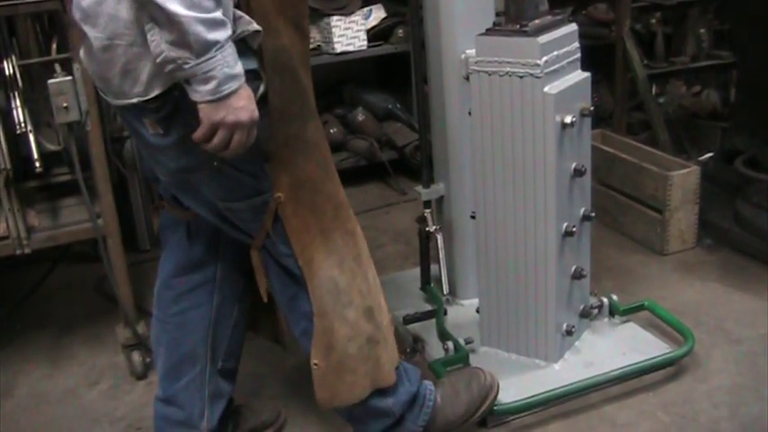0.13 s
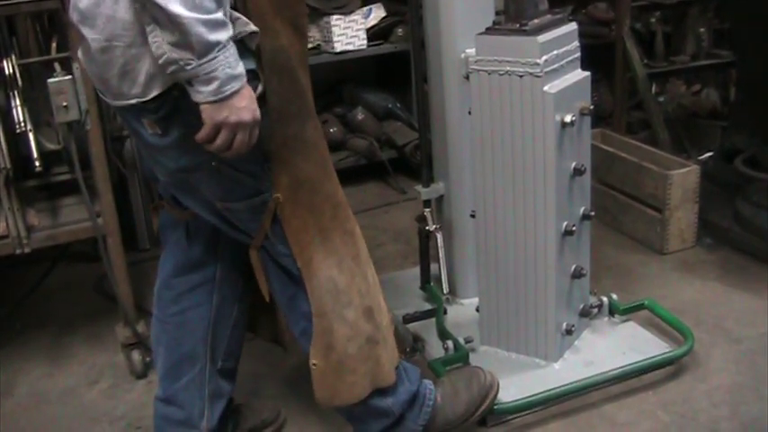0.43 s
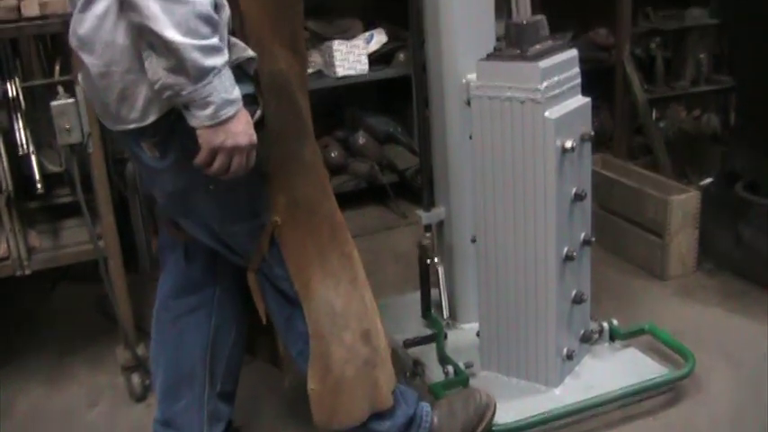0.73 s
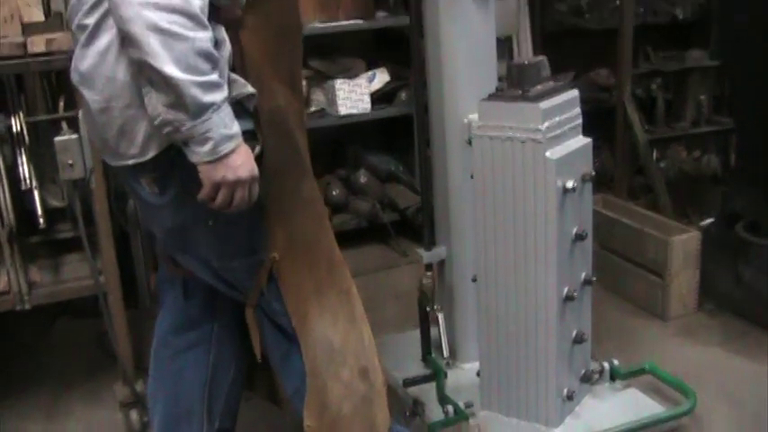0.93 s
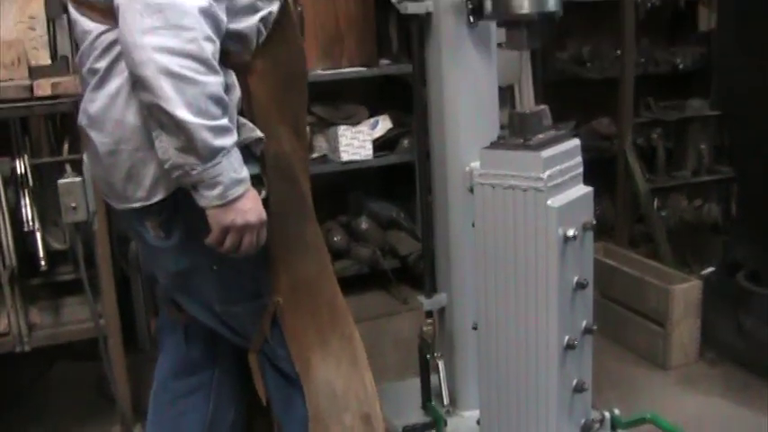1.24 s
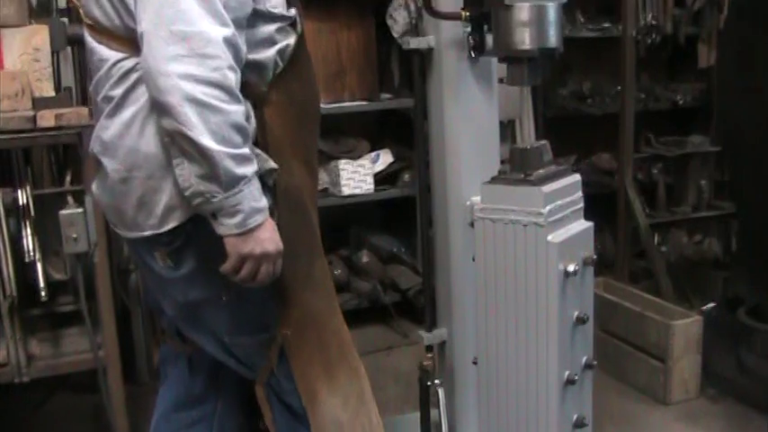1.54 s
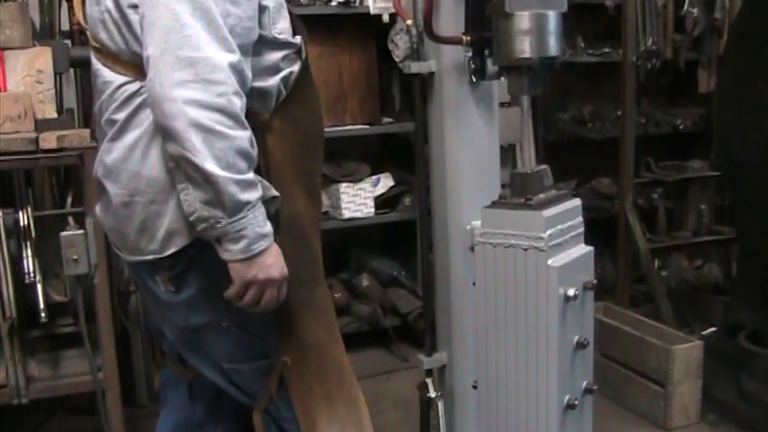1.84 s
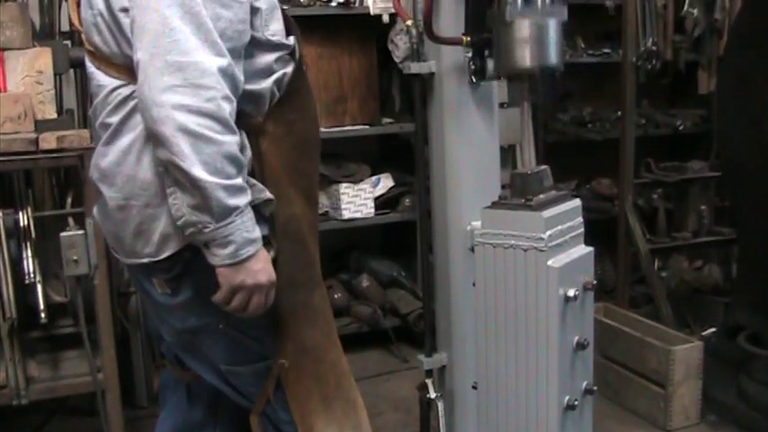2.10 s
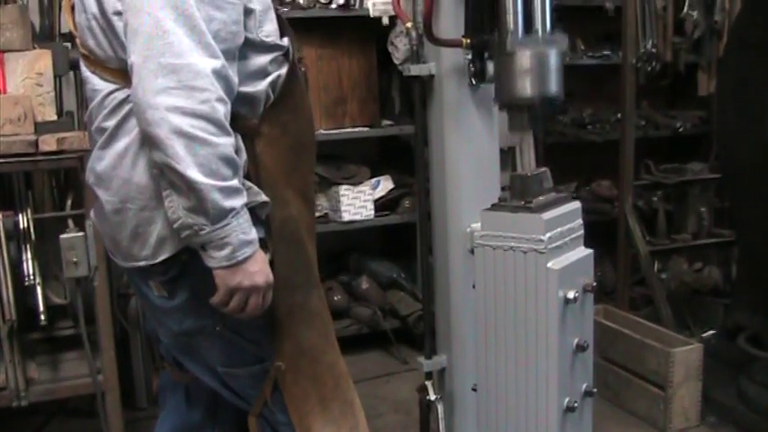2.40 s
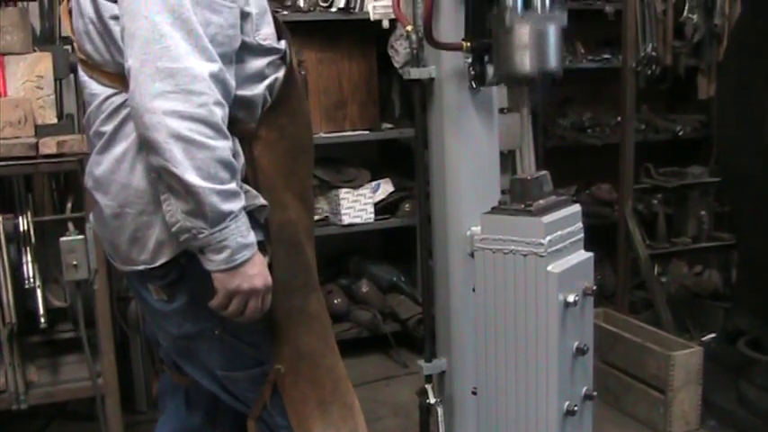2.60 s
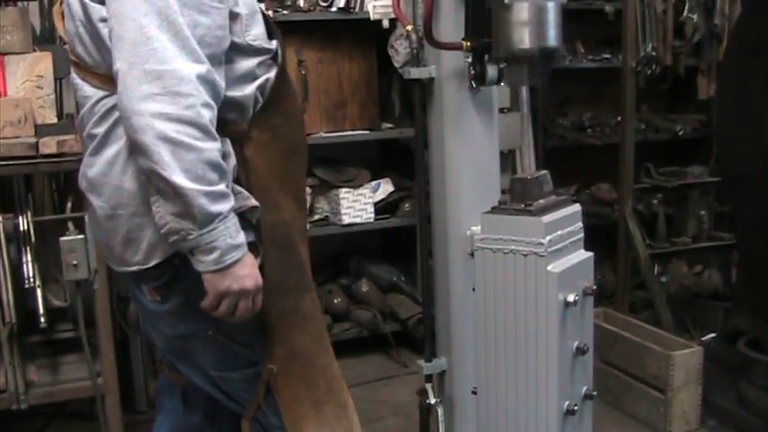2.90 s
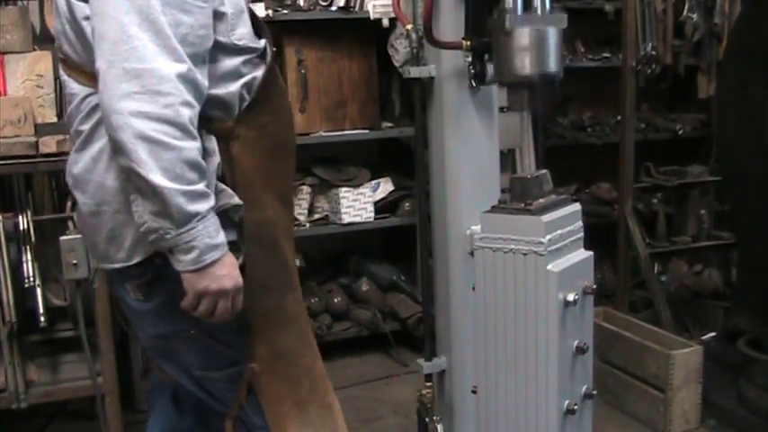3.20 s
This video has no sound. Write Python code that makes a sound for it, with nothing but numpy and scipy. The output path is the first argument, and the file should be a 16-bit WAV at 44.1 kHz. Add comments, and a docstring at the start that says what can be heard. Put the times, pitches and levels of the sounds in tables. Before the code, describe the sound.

An air power hammer hisses loudly over soft thuds, close by in a ringing workshop. At 0.7 seconds the air stops, followed by a knock, a sharp click and steel clanks. A short puff comes at 1.1 seconds, then a faint sinking hum. From 1.6 seconds the hiss returns, with heavier thuds about three times a second. At 3 seconds it cuts off with knocks, a click and clanks.

```python
"""An air power hammer idles on its foot treadle: exhaust air hisses from the valve and the ram thuds at
both ends of its stroke. The treadle is let go: the air stops at 0.7 s, the stop knocks, the valve clicks,
the steel linkage clanks. A short puff vents and a faint hum sinks. From 1.6 s the hammer runs again with
heavier thuds; at 3 s it shuts off with more knocks, a click and clanks. Throughout, the hard workshop
rings on for half a second and an automatic gain control turns loud passages down."""
import sys
import numpy as np
from scipy import signal
from scipy.fft import rfft, irfft, next_fast_len
from scipy.io import wavfile
from scipy.ndimage import uniform_filter1d

SR = 44100
rng = np.random.default_rng(int(sys.argv[2]) if len(sys.argv) > 2 else 0)


def int16_out(signal):
    """Quantize to a 16-bit WAV file."""
    q = np.round(np.clip(np.atleast_2d(signal).T, -1, 1) * 32767)
    wavfile.write(sys.argv[1], SR, q.astype(np.int16))


N = 147735
LEAD_IN = 30000  # samples
TOTAL = N + LEAD_IN
TIME_S = (np.arange(TOTAL) - LEAD_IN) / SR


# jet flow, one list per valve opening: time_s, level_db, roar_offset_db
JET_OPENINGS = [
    [(0.0, -19.5, 0.5), (0.674, -19.5, 1.5), (0.68, -18.5, 0)],
    [(1.6, -21.5, 1.5), (1.614, -16, 2.5), (1.662, -17.5, 1), (2.538, -20, 0), (2.984, -19, 0.5),
     (3.0, -19.5, 4)],
]
# short vent: time_s, level_db
PUFF_ENVELOPE = [(1.086, -47), (1.093, -29), (1.101, -26.5), (1.115, -23.5), (1.135, -23.5), (1.15, -29)]
# jet hiss: freq_hz, density_db
HISS_SPECTRUM = [(1300, -22), (2200, -11.5), (2900, -5.5), (3800, -2.5), (4970, -6), (5550, -2.5),
                 (5950, 1), (6500, 0), (7200, 0.5), (7600, -3.5), (8800, -8), (10000, -7), (11000, -9),
                 (12000, -10), (13500, -13.5), (15650, -15.5), (15800, -60)]
# jet roar: freq_hz, density_db
ROAR_SPECTRUM = [(150, -37), (250, -20.5), (410, -15), (560, -11.5), (700, -12), (880, -7), (1010, -4.5),
                 (1400, -2), (1750, 0), (1900, 0), (2100, 1), (2300, -6.5), (2600, -5.5), (3400, -9.5),
                 (5700, -60)]
# vent noise: freq_hz, density_db
PUFF_SPECTRUM = [(240, -53), (400, -24), (560, -11), (800, -15), (1280, -3.5), (1480, 0), (1980, -5),
                 (2370, -2.5), (3500, -1.5), (4400, 1), (4900, 0), (5400, -3.5), (7300, -0.5), (8700, -1),
                 (9500, -5.5), (15600, -14.5), (15800, -58)]

def exhaust(open_s=0.027, shut_db_per_s=500):
    """The air jet swells as the valve opens, follows the flow and is cut off when it shuts."""
    def flow(time_s, level_db):
        shut_db = shut_db_per_s * np.maximum(TIME_S - time_s[-1], 0)
        return amp(np.interp(TIME_S, time_s, level_db) - shut_db)

    hiss, roar = np.zeros((2, TOTAL))
    for opening, rows in enumerate(JET_OPENINGS):
        time_s, level_db, roar_offset_db = np.transpose(rows)
        rise = np.clip(1 + (TIME_S - time_s[0]) / open_s, 0, 1) ** 3 if opening else 1
        level = rise * flow(time_s, level_db)
        hiss += level
        roar += level * amp(np.interp(TIME_S, time_s, roar_offset_db))
    time_s, level_db = np.transpose(PUFF_ENVELOPE)
    puff = (TIME_S > time_s[0]) * flow(time_s, level_db)
    jet = hiss * stereo_noise(HISS_SPECTRUM, flicker_db=1)
    jet += amp(-6.5) * roar * stereo_noise(ROAR_SPECTRUM, flicker_db=2.5)
    jet += puff * stereo_noise(PUFF_SPECTRUM, flicker_db=0)
    return amp(-3.5) * jet + amp(-7) * reverb(jet)


# ram blows: start_s, level_db, rattle_db, focus_hz
RAM_THUDS = [(0.223, -25.5, -11, 530), (0.329, -32.5, -8, 471), (0.572, -27.5, -8, 544),
             (0.659, -29.5, -8, 584), (0.687, -25.5, -5, 216), (1.127, -33, -8, 600), (1.6, -30, 1, 483),
             (1.846, -25.5, -3, 600), (1.919, -29, -3, 390), (2.14, -15, 2.5, 402),
             (2.252, -23.5, -13, 230), (2.492, -13.5, 1, 233), (2.615, -24, -12, 323),
             (2.849, -11, 4.5, 247), (2.974, -21, -6, 245), (3.26, -24, -16, 550), (3.285, -19.5, -7, 224)]
# hammer frame: pitch_hz, level_db, t60_s
FRAME_MODES = [(95, -10, 0.055), (140, -3.5, 0.066), (184.8, -18.5, 0.29), (228.6, 3.5, 0.053),
               (321, -3, 0.049), (392, -1.5, 0.075), (470.4, -3.5, 0.088), (601, 4, 0.047),
               (786, 0.5, 0.13)]

def ram(out):
    """The ram ends its stroke: the frame rings low and rattles."""
    rattle = [(100, -25), (600, -6), (1500, 0), (3300, 0), (4500, -18), (16000, -60)]  # freq_hz, density_db
    for start_s, level_db, rattle_db, focus_hz in RAM_THUDS:
        body = ring(FRAME_MODES, focus_hz, wander=0.15, db_per_octave=5)
        body += burst(rattle, rattle_db, t60_s=0.081)
        add_blow(out, body, start_s, level_db, attack_s=0.008, wet_db=-6)


# valve action: start_s, level_db, low_knock_db
VALVE_CLICKS = [(0.9111, -15.5, 9.5), (1.4445, -51, -2), (1.5144, -61, -2), (3.2005, -15, 6)]
# valve body: pitch_hz, level_db, t60_s
VALVE_MODES = [(4300, -14, .12), (4900, 4, .012), (5720, -8, .02), (6800, 3, .015), (6850, -20, .1),
               (7930, -3, .02), (8500, -16, .04), (10700, -5, .01), (13900, 4, .008), (15000, 3, .006)]

def valve(out):
    """The valve clicks: a short crack over a bright ring."""
    for start_s, level_db, low_db in VALVE_CLICKS:
        crack = [(300, low_db - 20), (1300, low_db), (3000, -8), (5000, -3.5), (14000, 0), (16500, -1.5)]
        body = ring(VALVE_MODES, focus_hz=8000, wander=0.5) + burst(crack, level_db=2, t60_s=0.0085)
        add_blow(out, body, start_s, level_db, attack_s=0.001, wet_db=-2)


# treadle blows: start_s, level_db, focus_hz
TREADLE_KNOCKS = [(.8186, -20.5, 1900), (.84, -31, 800), (3.0611, -17.5, 2300), (3.068, -19, 2300),
                  (3.085, -25.5, 1200)]
# treadle stop: pitch_hz, level_db, t60_s
STOP_MODES = [(737, 2.5, 0.12), (1030, 0.5, 0.02), (1624, 1, 0.034), (2240, 2.5, 0.029), (2450, -13, 0.029),
              (3590, 7, 0.027), (6420, 4, .015)]

def treadle(out):
    """The released treadle hits its stop with a dull knock."""
    dull = [(300, -10), (800, -1), (2500, 0.5), (6000, -11.5), (16000, -35)]
    for start_s, level_db, focus_hz in TREADLE_KNOCKS:
        body = ring(STOP_MODES, focus_hz, wander=0.22) + burst(dull, level_db=-2, t60_s=0.096)
        add_blow(out, body, start_s, level_db, attack_s=0.001, wet_db=-3.5)


# linkage blows: start_s, level_db, focus_hz
LINKAGE_CLANKS = [(0.9631, -17.5, 1800), (.968, -19.5, 1460), (.98, -33, 900), (1.003, -32.5, 1450),
                  (1.02, -32, 1600), (3.205, -22, 1800), (3.2344, -16, 1820), (3.2672, -13.5, 2800),
                  (3.28, -20, 3400), (3.291, -19.5, 3100), (3.303, -22.5, 2800), (3.328, -24, 2800)]
# steel links: pitch_hz, level_db, t60_s
LINKAGE_MODES = [(860, -2, 0.064), (1187, -8, 0.078), (1434, -3.5, 0.042), (1610, -8, 0.056),
                 (1823, 2, 0.03), (1855, -15, 0.019), (2420, -11.5, 0.067), (2860, -6, 0.042),
                 (3130, -10, 0.023), (3590, -10, 0.024), (4030, -6.5, 0.064), (4880, -1, 0.039),
                 (7040, 4, 0.033), (8550, 0, .03)]

def linkage(out):
    """The steel linkage clanks in quick clusters of ringing blows."""
    sharp = [(300, -4), (1000, 0), (3000, -2.5), (9000, -14), (16000, -55)]
    for start_s, level_db, focus_hz in LINKAGE_CLANKS:
        body = ring(LINKAGE_MODES, focus_hz, wander=0.22) + burst(sharp, level_db=-9, t60_s=0.059)
        add_blow(out, body, start_s, level_db, attack_s=0.002, wet_db=0)


# sinking hum: time_s, pitch_hz, level_db
HUM_GLIDE = [(1.15, 205, -65), (1.22, 189.6, -52), (1.36, 176, -54), (1.42, 170.6, -60), (1.5, 154, -53),
             (1.56, 150, -59), (1.6, 152, -75)]
# microphone hiss: freq_hz, density_db
MIC_SPECTRUM = [(120, -29), (200, 3), (263, -7), (517, -2), (588, -7), (2000, -6), (5870, -15),
                (15700, -31)]
# workshop rumble: freq_hz, density_db
RUMBLE_SPECTRUM = [(15, -38), (25, -12), (159, -4.5), (213, -8.5), (489, -18.5), (567, -18), (814, -15.5),
                   (1030, -24), (1820, -33), (2620, -39), (4000, -42), (5200, -59), (8800, -120)]

def background():
    """An unsteady low hum, the hiss of each microphone and workshop rumble."""
    time_s, pitch_hz, level_db = np.transpose(HUM_GLIDE)
    phase = 2 * np.pi * np.cumsum(np.interp(TIME_S, time_s, pitch_hz)) / SR
    drift = 0.0286 * np.cumsum(rng.standard_normal(TOTAL))
    hum = amp(np.interp(TIME_S, time_s, level_db)) * np.sin(phase + drift)
    hiss = amp(-59) * coloured_noise(MIC_SPECTRUM, (2, TOTAL))
    rumble = amp(-52.5) * stereo_noise(RUMBLE_SPECTRUM, flicker_db=2.5)
    return rumble + hum + hiss


# workshop decay: freq_hz, t60_s
ROOM_DECAY = [(200, 0.29), (1000, 0.48), (3000, 0.53), (7000, 0.37), (12000, 0.29), (16000, 0.33)]

def reverb(x):
    """The hard room answers after 8 ms; each frequency dies at its own rate."""
    hz, t, bins = signal.stft(rng.standard_normal((2, LEAD_IN)), SR, nperseg=256)
    decay = amp(-60 * t / curve(ROOM_DECAY, hz)[:, None])
    tail = spread(signal.istft(bins * decay, SR, nperseg=256)[1], np.ones_like)
    tail = np.pad(tail, ((0, 0), (350, 0))) / np.linalg.norm(tail[0])
    return signal.fftconvolve(x, tail, axes=1)[:, :x.shape[1]]


# stereo width: freq_hz, side_over_mid_db
STEREO_WIDTH = [(60, -20), (92, -21), (140, -19), (210, -38), (330, -20), (500, -22.5), (770, -16.5),
                (1170, -21), (1790, -19), (2740, -9.5), (4190, -8), (6410, -11.5), (9810, -4),
                (15000, -2.5)]

def spread(pair, colour):
    """Two unrelated signals become left and right, wider in the treble."""
    def response(hz):
        angle = np.arctan(amp(curve(STEREO_WIDTH, hz)))
        return colour(hz) * [np.cos(angle), np.sin(angle)]

    mid, side = filtered(pair, response)
    return np.array([mid + side, mid - side])


BLOW_TIME_S = np.arange(SR // 4) / SR

def ring(modes, focus_hz, wander, db_per_octave=13):
    """Struck modes decay, weaker away from focus_hz and roughened by phase wander."""
    hz, level_db, t60_s = np.transpose(modes)[..., None]
    steps = rng.standard_normal((len(modes), len(BLOW_TIME_S)))
    drift = wander * np.sqrt(hz / SR) * np.cumsum(steps, axis=1)
    focus_loss_db = db_per_octave * np.abs(np.log2(hz / focus_hz))
    scatter_db = rng.normal(0, 1.5, hz.shape)
    gains = amp(level_db - focus_loss_db + scatter_db - 60 * BLOW_TIME_S / t60_s)
    return np.sum(gains * np.sin(2 * np.pi * hz * BLOW_TIME_S + drift), axis=0)


def burst(spectrum, level_db, t60_s):
    """The dying noise of an impact."""
    return amp(level_db - 60 * BLOW_TIME_S / t60_s) * coloured_noise(spectrum, len(BLOW_TIME_S))


def add_blow(out, body, start_s, level_db, attack_s, wet_db):
    """Mix in one centred blow with its own room tail; level_db sets its dry peak."""
    hit = body * (1 - np.exp(-BLOW_TIME_S / attack_s))
    hit = amp(level_db) * hit / np.abs(hit).max()
    hit = np.tile(np.pad(hit, (0, SR // 2)), (2, 1))
    start = round(start_s * SR) + LEAD_IN
    span = out[:, start:start + hit.shape[1]]
    span += (hit + amp(wet_db) * reverb(hit))[:, :span.shape[1]]


def stereo_noise(spectrum, flicker_db):
    """Unit-rms noise that flickers in patches of time and frequency."""
    bins = signal.stft(rng.standard_normal((2, TOTAL)), nperseg=512)[2]
    patches = uniform_filter1d(rng.standard_normal(bins.shape[1:]), 6, axis=0)
    patches = unit_rms(uniform_filter1d(patches, 14, axis=1))
    pair = signal.istft(bins * amp(flicker_db * patches), nperseg=512)[1][:, :TOTAL]
    return unit_rms(spread(pair, lambda hz: amp(curve(spectrum, hz))))


def coloured_noise(spectrum, shape):
    return unit_rms(filtered(rng.standard_normal(shape), lambda hz: amp(curve(spectrum, hz))))


def filtered(x, response):
    size = next_fast_len(x.shape[-1] + 8192)
    gain = response(np.fft.rfftfreq(size, 1 / SR))
    return irfft(rfft(x, size) * gain, size)[..., :x.shape[-1]]


def curve(points, hz):
    """Interpolate (freq_hz, value) points on a log frequency axis."""
    freq_hz, values = np.transpose(points)
    return np.interp(np.log(hz + 1), np.log(freq_hz + 1), values)


def unit_rms(x):
    return x / np.sqrt(np.mean(x ** 2) + 1e-20)


def amp(db):
    return 10 ** (np.asarray(db) / 20)


def scene():
    """Exhaust and blows over the workshop background, in stereo."""
    mix = exhaust()
    for source in (ram, valve, treadle, linkage):
        source(mix)
    return (mix + background())[:, LEAD_IN:]


def record(dry, follow_s=0.072, knee_db=-31, slope=0.33, boost_db=8, low_cut_hz=42.7, top_hz=16500):
    """Gain falls as recent loudness passes the knee; deep bass and top treble are cut."""
    pole = np.exp(-1 / (follow_s * SR))
    power = np.mean(dry ** 2, axis=0)
    recent = signal.lfilter([1 - pole], [1, -pole], power, zi=[pole * power[:SR // 10].mean()])[0]
    gain_db = boost_db - slope * np.maximum(10 * np.log10(recent + 1e-12) - knee_db, 0)
    return filtered(dry * amp(gain_db), lambda hz: (hz < top_hz) * hz ** 2 / (hz ** 2 + low_cut_hz ** 2))


dry = scene()
out = record(dry)
int16_out(out)
```